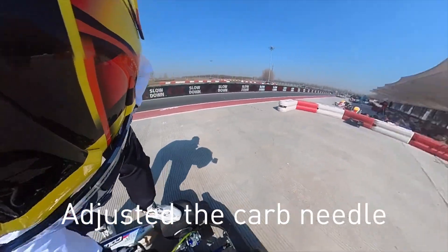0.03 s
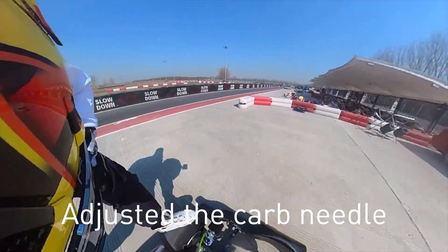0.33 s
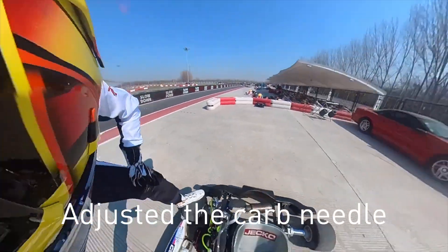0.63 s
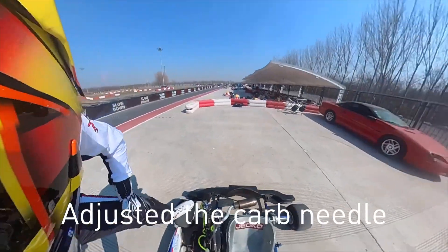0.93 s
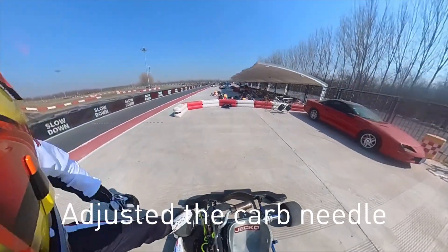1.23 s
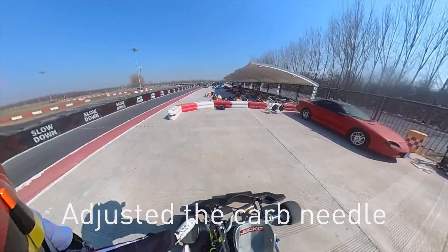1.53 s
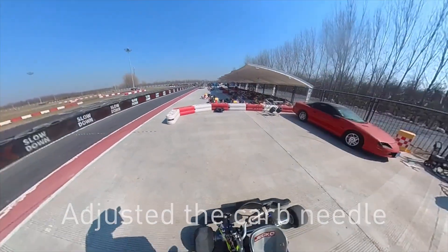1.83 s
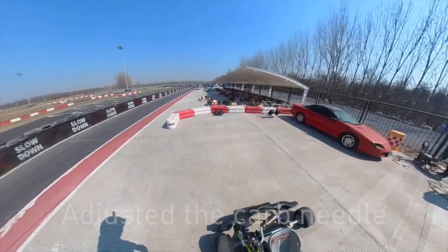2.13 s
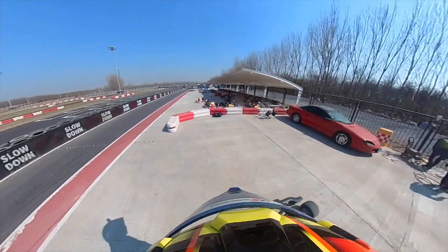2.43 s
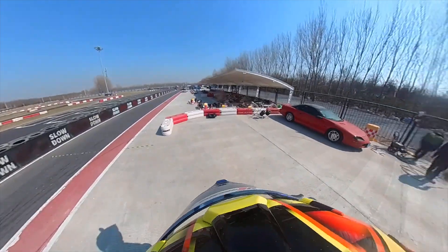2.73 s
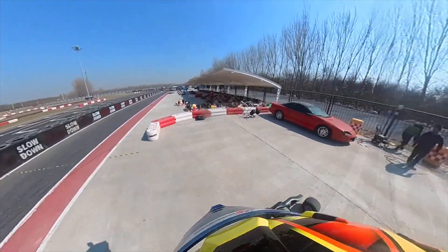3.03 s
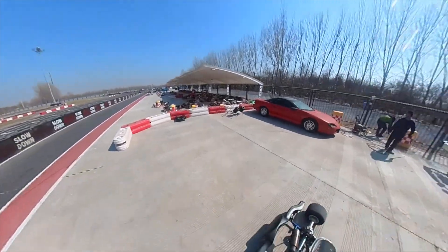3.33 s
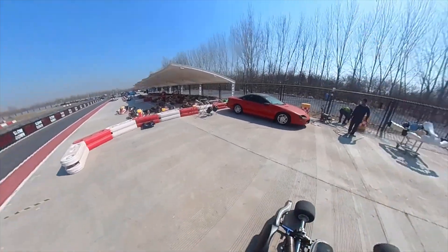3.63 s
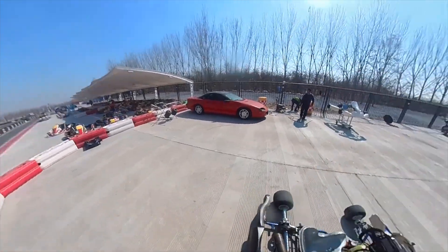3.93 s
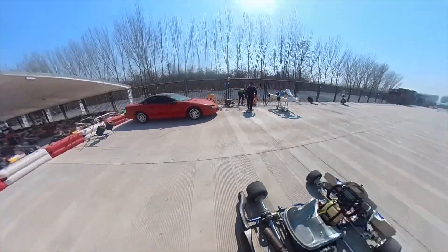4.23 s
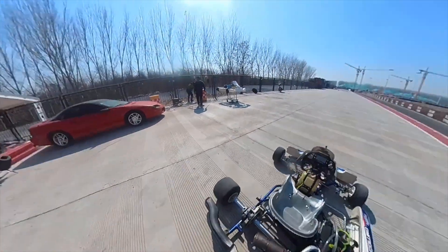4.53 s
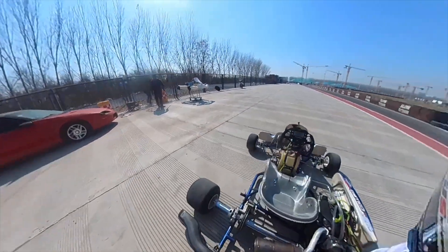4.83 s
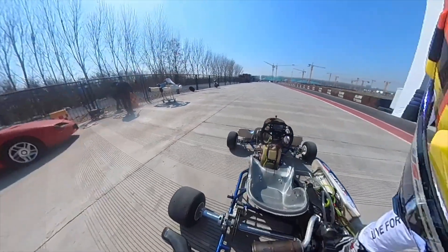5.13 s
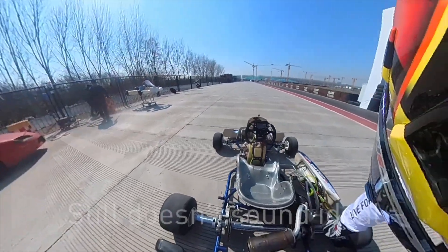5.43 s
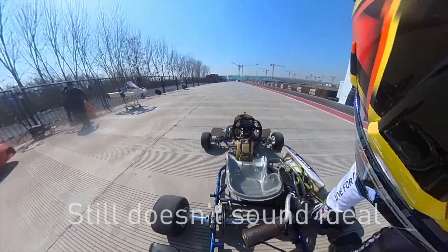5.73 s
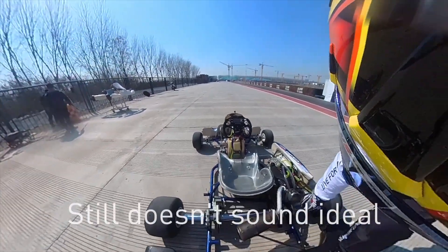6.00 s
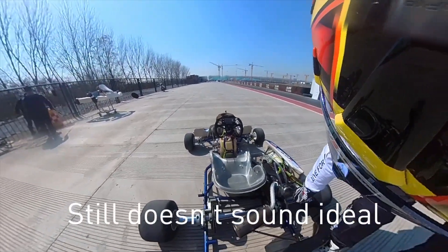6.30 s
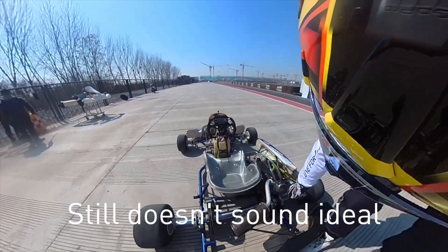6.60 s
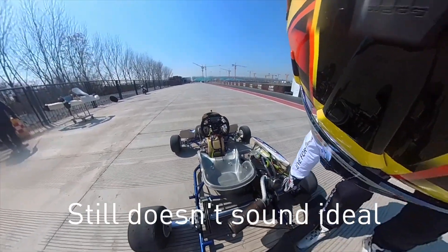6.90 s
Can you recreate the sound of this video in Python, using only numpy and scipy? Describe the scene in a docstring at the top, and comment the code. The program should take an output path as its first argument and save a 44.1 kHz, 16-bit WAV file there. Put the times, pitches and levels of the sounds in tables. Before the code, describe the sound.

On an open concrete paddock, a few soft knocks are followed by the clack and brief grind of a starter. A two-stroke kart engine catches and idles in rapid, uneven exhaust thumps, with metallic snaps, ticking gears and drive chatter. The microphone is close, with the kart slightly to the right. The clatter dulls for about a second, then brightens again. Another engine hums faintly in the distance.

```python
"""Two-stroke kart starting and idling

On an open concrete paddock, a few soft knocks; then the starter bites and grinds, and the engine catches,
firing every third turn of the crank. Each firing is a knock, a metallic snap and a swooping exhaust
thump. The gears tick on the two empty turns, and after a weak firing the slack drive chatters.
For a second the driver's helmet shields the treble. Another engine hums far off."""
import sys
import numpy as np
from scipy import signal
from scipy.fft import rfft, irfft
from scipy.io import wavfile
from scipy.ndimage import uniform_filter1d, minimum_filter1d, map_coordinates

SR = 44100
rng = np.random.default_rng(int(sys.argv[2]) if len(sys.argv) > 2 else 0)


def wav_out(sig):
    """Save sig, one row per channel (or a flat mono array), as 16-bit PCM at SR to the path in sys.argv[1]."""
    wavfile.write(sys.argv[1], SR, np.round(np.clip(np.atleast_2d(sig).T, -1, 1) * 32767).astype(np.int16))


N = 315756
TIME = np.arange(N) / SR

# the engine's firings, with relative levels: port_opens_s, thump_db, knock_db
FIRINGS = [(0.733, -13.5, -24), (0.801, -21.0, -22.5), (0.87, -23, -23), (0.951, -33, -30),
           (1.022, -19.5, -28.5), (1.104, -21.5, -25), (1.174, -10.5, -23.5), (1.264, -16.5, -29),
           (1.345, -8, -18), (1.437, -15, -28), (1.523, -8.5, -19.0), (1.618, -14.5, -28.5),
           (1.709, -7.5, -19), (1.801, -9.5, -23.5), (1.899, -7, -21.5), (2.004, -7.5, -21),
           (2.104, -7.5, -24.5), (2.207, -7.5, -18.5), (2.306, -20, -32), (2.404, -9.0, -21.0),
           (2.509, -20.5, -34), (2.613, -6, -21), (2.721, -7.5, -22), (2.83, -9, -23.5), (2.939, -7, -22.5),
           (3.048, -9, -23), (3.148, -8.5, -24.5), (3.247, -10, -23.5), (3.342, -9.5, -22.5),
           (3.441, -16, -24.5), (3.542, -11, -16.5), (3.628, -15.5, -29), (3.715, -8, -18.5),
           (3.808, -10, -23.5), (3.904, -11.5, -23.5), (4.008, -7.5, -19.5), (4.106, -14, -30.0),
           (4.202, -9, -21), (4.293, -13.5, -32), (4.38, -8, -27), (4.473, -6.5, -25),
           (4.564, -10.5, -29.5), (4.66, -6, -20.5), (4.758, -12, -30.5), (4.854, -7, -21.5),
           (4.949, -8.5, -23.5), (5.046, -12.5, -29), (5.138, -8.5, -22.5), (5.231, -14.0, -30.5),
           (5.319, -5.5, -19.5), (5.414, -7.5, -25), (5.509, -12.5, -25.5), (5.599, -7.5, -22),
           (5.692, -12.0, -29), (5.781, -7.5, -22), (5.874, -12.5, -26.5), (5.965, -7.5, -19),
           (6.061, -11.5, -26), (6.149, -8, -21), (6.234, -14.0, -33.5), (6.318, -7, -21.5),
           (6.409, -6.5, -23.5), (6.499, -7, -23), (6.588, -8, -11), (6.691, -7.0, -20.5),
           (6.792, -14, -21.5), (6.888, -8, -19.5), (6.984, -14, -25.5), (7.073, -7, -21.0)]
# broad tone of the engine block and pipe: freq_hz, gain_db
BLOCK_TONE = [(60, -12.5), (150, -3), (280, 0), (450, 2), (700, 1), (1100, -1.5), (1450, -0.5), (2000, -8),
              (2700, -8.5), (4500, -19), (6500, -36.5), (16000, -21)]
# the silencer's hollow tone: freq_hz, gain_db
SILENCER_TONE = [(50, -41), (120, -18), (215, 3.5), (290, -3), (385, -3), (450, -16), (600, -29.5),
                 (2000, -63)]
# ring of the starter's gear wheel: pitch_hz, width_hz, gain_db
GEAR_MODES = [(597, 92, 5), (1064, 51, 8), (1266, 19, 9.5), (1380, 38, 5), (3100, 83, -11), (4840, 66, 9)]
# the driver comes between engine and listener: time_s, upper_clatter_db, steel_parts_db
DRIVER_SHADOW = [(1.5, 0, -1), (2.2, 0.5, -2), (2.55, -10.5, -9), (3.15, -7, -7), (3.55, -2.5, -2),
                 (4.3, 1.5, 0), (7.1, 1, 0.5)]

CRANK_S = 0.62  # the crank starts to move
WEAK_DB = -11.5  # a thump under this leaves the drive slack; every dB above takes up some slack
HOLD_S = 0.023  # nominal time from the port opening to the thump's release


def undb(db):
    """Decibels to gain."""
    return 10 ** (np.asarray(db) / 20)


def response(tone, hz):
    """Gain of a (freq_hz, gain_db) tone curve at the given frequencies."""
    freq_hz, gain_db = np.transpose(tone)
    return undb(np.interp(np.log(hz + 1), np.log(freq_hz), gain_db))


def follow(rows, column=1):
    """One column of a control curve at every sample."""
    rows = np.array(rows)
    return np.interp(TIME, rows[:, 0], rows[:, column])


def colour(x, tone, modes=(), size=8192):
    """Ring x through a body with this tone and these modes; white noise keeps its power."""
    hz = np.fft.rfftfreq(size, 1 / SR)
    peaks = sum(undb(db) ** 2 / (1 + (2 * (hz - pitch) / width) ** 2) for pitch, width, db in modes)
    gain = response(tone, hz) * np.sqrt(1 + peaks)
    cepstrum = irfft(np.log(gain / np.sqrt(np.mean(gain ** 2))))
    # minimum phase: the ring follows the blow
    cepstrum[1:size // 2] *= 2
    cepstrum[size // 2 + 1:] = 0
    return signal.fftconvolve(x, irfft(np.exp(rfft(cepstrum))))[:N]


def stereo(mid, side):
    """Left and right: alike in the bass, unrelated in the treble."""
    # stereo width: freq_hz, side_minus_mid_db
    width = [(30, -5), (70, -12), (140, -14), (350, -16), (700, -19), (1300, -18), (2800, -6), (5500, -1.5),
             (16000, 0)]
    side = irfft(rfft(side) * response(width, np.fft.rfftfreq(N, 1 / SR)), N)
    return np.array([mid + side, mid - side])


def flicker(rate_hz, depth_db):
    """A gain of mean power 1 that wanders at random."""
    knots = rng.standard_normal(N // 8)
    gain = undb(depth_db * np.interp(TIME * rate_hz, np.arange(len(knots)), knots))
    return gain / np.sqrt(np.mean(gain ** 2))


def bursts(times, db, rise_s, fall_s):
    """Power envelope of blows that swell to a peak at the given times and die away."""
    power = np.zeros(N)
    for peak_s, gain in zip(times, undb(db)):
        near = slice(max(int((peak_s - 10 * rise_s) * SR), 0), int((peak_s + 10 * fall_s) * SR))
        t = TIME[near] - peak_s
        power[near] += (gain * np.exp(np.minimum(t / rise_s, -t / fall_s))) ** 2
    return power


def rush(force, tone):
    """Turbulent air, as strong as force."""
    return stereo(*(colour(force * rng.standard_normal(N), tone) for _ in range(2)))


def rattle(force, tone, modes, rate_hz, spread_db, scatter_s):
    """Random metal contacts, as strong as force, ring one body; the frame scatters each one."""
    contacts = (rng.random(N) < rate_hz / SR) * rng.choice([-1, 1], N)
    contacts = contacts * undb(spread_db * rng.standard_normal(N))
    contacts *= force / np.sqrt(np.mean(contacts ** 2))
    pole = np.exp(-2 / (scatter_s * SR))
    tails = np.sqrt(signal.lfilter([1 - pole], [1, -pole], contacts ** 2 + 1e-18))
    mid = (contacts + tails * rng.standard_normal(N)) / np.sqrt(2)
    side = tails * rng.standard_normal(N)
    return stereo(colour(mid, tone, modes), colour(side, tone, modes))


def running(fade_s=0.027):
    """Gain of the turning engine: it rises from silence as the crank starts to move."""
    return np.clip((TIME - CRANK_S) / fade_s + 1, 0, 1)


def strokes(turns_per_firing=3):
    """Per firing: the length of a crank turn (s), and how far the thump exceeds a weak one (dB)."""
    port_s, thump_db, _ = np.transpose(FIRINGS)
    gaps = np.diff(port_s)
    return np.append(gaps, np.median(gaps)) / turns_per_firing, np.maximum(thump_db - WEAK_DB, 0)


def paddock(air_db=-41, waver=0.00635):
    """Open-air rumble and another engine running steadily in the distance."""
    # tone of the open air: freq_hz, gain_db
    air_tone = [(18, -45), (30, -45), (75, -2), (303, -1.5), (600, -9), (666, -9), (2980, -31),
                (5900, -46.5), (16000, -44)]
    # partials of the distant engine: pitch_hz, level_db
    far_engine = [(205, -48), (297, -58), (398, -50), (500, -50.5), (598, -52), (834, -60.5)]
    speed = 1 + waver * (flicker(rate_hz=9, depth_db=6) - 1)
    clock = 2 * np.pi * np.cumsum(speed) / SR
    hum = sum(np.sqrt(2) * undb(db) * flicker(rate_hz=14, depth_db=-3.5) * np.sin(hz * clock)
              for hz, db in far_engine)
    return hum + rush(undb(air_db), air_tone)


def knocks(metal_gain_db=-6, boom_gain_db=-4):
    """Single blows that ring the metal and boom in the hollow parts."""
    # knocks on the frame, then the starter's clacks: start_s, metal_db, boom_db
    blows = [(0.033, -29, -31), (0.095, -38, -30), (0.168, -27.5, -41), (0.212, -34.5, -40),
             (0.236, -32, -21.5), (0.548, -33, -22), (0.574, -25.5, -34), (0.607, -6, -21.5),
             (0.686, -4.5, -40), (0.724, -12.5, -8.5), (0.796, -24, -27), (0.857, -14.5, -36), (1, -8, -30),
             (1.243, -10.5, -29)]
    start_s, metal_db, boom_db = np.transpose(blows)
    strike = bursts(start_s + 0.00081, metal_db + metal_gain_db, rise_s=0.0018, fall_s=0.015)
    boom = bursts(start_s + 0.0032, boom_db + boom_gain_db, rise_s=0.0025, fall_s=0.014)
    metal = rattle(np.sqrt(strike), BLOCK_TONE, GEAR_MODES, rate_hz=4000, spread_db=1.5, scatter_s=0.0022)
    return metal + rush(np.sqrt(boom), SILENCER_TONE)


def starter(gain_db=3, bite_s=0.0021, release_s=0.0097):
    """The pinion's teeth bite, scrape and slip on the ring gear."""
    # the pinion's scrapes: start_s, length_s, level_db
    scrapes = [(0.571, 0.0073, -35.5), (0.602, 0.011, -27.5), (0.686, 0.0054, -27), (0.73, 0.005, -28),
               (0.769, 0.095, -32), (0.863, 0.012, -26), (0.915, 0.11, -27)]
    # tone of the scraping teeth: freq_hz, gain_db
    teeth_tone = [(500, -30), (2000, 0), (4800, -6), (6400, -13.5), (8600, -1), (11500, 5), (16000, 2.5)]
    force = np.zeros(N)
    for start_s, length_s, level_db in scrapes:
        edges = np.minimum((TIME - start_s) / bite_s, (start_s + length_s - TIME) / release_s)
        force += undb(level_db + gain_db) * np.exp(np.minimum(edges, 0))
    return rattle(force, teeth_tone, GEAR_MODES, rate_hz=1600, spread_db=1, scatter_s=0.0026)


def piston_and_gears(snap_db=-24, hardness=1.37, taut_per_db=1.2, sizzle_db=-50, jitter_s=0.0022):
    """The piston slaps harder with a harder knock; clutch and gears tick on the two empty turns."""
    # tone of the small steel parts: freq_hz, gain_db
    steel_tone = [(1500, -26), (4000, 3), (5200, -1), (6800, -10), (8000, -5.5), (8900, 0), (9900, -5.5),
                  (11500, 6.5), (16000, 2)]
    # their ring: pitch_hz, width_hz, gain_db
    steel_modes = [(4230, 48, 5), (5370, 44, -2), (7030, 100, -0.5), (8750, 24, 6.5), (9250, 51, 2.9),
                   (10900, 72, 0), (13200, 79, 1), (15200, 120, 4)]
    port_s, _, knock_db = np.transpose(FIRINGS)
    turn_s, excess_db = strokes()
    loose_s = port_s + jitter_s * rng.standard_normal((len(port_s), 3)).T
    luck_db = rng.uniform(-5, 5, (len(port_s), 3)).T
    slap_db = snap_db + hardness * (knock_db - np.median(knock_db))
    tick_db = -34 - taut_per_db * excess_db
    power = bursts(port_s - 0.0069, slap_db, rise_s=0.0007, fall_s=0.006)
    # a softer snap just ahead of the slap, then one tick for each empty turn
    power += bursts(loose_s[0] - 0.015, slap_db - 7 + luck_db[0], rise_s=0.0018, fall_s=0.0051)
    power += bursts(loose_s[1] + turn_s, tick_db + luck_db[1], rise_s=0.001, fall_s=0.007)
    power += bursts(loose_s[2] + 2 * turn_s, -39 + luck_db[2], rise_s=0.001, fall_s=0.006)
    power += (undb(sizzle_db) * running()) ** 2
    force = np.sqrt(power) * undb(follow(DRIVER_SHADOW, 2))
    return rattle(force, steel_tone, steel_modes, rate_hz=2600, spread_db=2.5, scatter_s=0.0009)


def driver_shadow(sound, split_hz=1900, low_share=0.19, treble_db=1.5):
    """The driver shadows the upper clatter; most of the lower bends round."""
    low = signal.sosfiltfilt(signal.butter(2, split_hz, fs=SR, output="sos"), sound)
    shadow_db = follow(DRIVER_SHADOW, 1)
    return low * undb(low_share * shadow_db) + (sound - low) * undb(shadow_db + treble_db)


def block(knock_gain_db=4, chatter_db=-20.5, taut_per_db=4, clatter_db=-30.5, cranking_db=3):
    """Combustion knocks the block before the port opens; after a weak firing the slack drive chatters."""
    # ring of the block and pipe: pitch_hz, width_hz, gain_db
    block_modes = [(387.2, 12, 9), (521, 30, 3), (1200, 16, -14), (1546, 8.4, 4), (1854, 16, 6),
                   (2078, 25, 2.5), (2222, 20, 5.5), (2442, 40, 3), (2586, 28, 5), (3443, 61, 4),
                   (4340, 140, -17)]
    # the pipe shell's strongest ring, from beside the kart and from behind: pitch_hz, width_hz, gain_db
    ring_beside = [(739, 24.4, 6.1)]
    ring_behind = [(886, 31, 8.2)]
    port_s, _, knock_db = np.transpose(FIRINGS)
    turn_s, excess_db = strokes()
    speed = np.clip((TIME - CRANK_S) / 0.79, 0, 1)  # the drive spins up
    knock = bursts(port_s - 0.008, knock_db + knock_gain_db, rise_s=0.005, fall_s=0.013)
    chatter = bursts(port_s + 0.8 * turn_s, chatter_db - taut_per_db * excess_db,
                     rise_s=0.008, fall_s=0.034)
    clatter = (undb(clatter_db + cranking_db * (1 - speed)) * running()) ** 2
    power = knock + chatter * speed ** 2 + clatter
    behind = np.interp(TIME, [4.3, 4.8], [0, 1])  # the listener steps round to the tail
    return sum(rattle(np.sqrt(power * share), BLOCK_TONE, block_modes + ring,
                      rate_hz=1500, spread_db=3, scatter_s=0.0047)
               for share, ring in [(1 - behind, ring_beside), (behind, ring_behind)])


def pipe_ring(t, settled, swell_s=0.0068, decay_s=0.038, spread_db=2.5, detune=0.025):
    """The pipe rings on after the port shuts, struck a little differently by every firing."""
    # the pipe's modes, relative to the thump: pitch_hz, cold_db, settled_db
    pipe_modes = [(283.2, -16.5, -32), (387.5, -24.5, -16)]
    after = np.maximum(t - HOLD_S, 0)
    ring = np.zeros(len(t))
    for hz, cold_db, settled_db in pipe_modes:
        force, heat = rng.standard_normal(2)
        gain = undb(cold_db + settled * (settled_db - cold_db) + spread_db * force)
        ring += gain * np.sin(2 * np.pi * hz * (1 + detune * heat) * after)
    return ring * (1 - np.exp(-after / swell_s)) * np.exp(-after / decay_s)


def gas_swoop(t, settled, vigour, open_hz=415, bottom_s=0.01152, sink_s=0.01547, rise_s=0.01208):
    """Base pitch and envelope of the gas: it sinks as the piston opens the port, rises as it closes."""
    # as the idle settles, the swing gets shorter and lower
    age = t / np.interp(settled, [0, 1], [1.099, 0.9])
    bottom_hz = np.interp(settled, [0, 1], [126.9, 113.5])
    closed_hz = np.interp(settled, [0, 1], [276, 251.3])
    # a weak firing starts from a lower note
    sink = (0.4 + 0.6 * vigour) * np.clip((bottom_s - age) / sink_s, 0, 1) ** 2.65
    rise = 1 - np.exp(-(np.maximum(age - bottom_s, 0) / rise_s) ** 1.5)
    hz = bottom_hz + (open_hz - bottom_hz) * sink + (closed_hz - bottom_hz) * rise
    attack = np.exp(np.minimum(age - 0.0049, 0) / 0.0054)
    release = np.exp(-np.maximum(age - HOLD_S, 0) / 0.0072)
    return hz, attack * release


def exhaust(gain_db=1, settling_s=(2.91, 4.9), detune=0.05, pitch_per_db=0.0364, muffle_hz=470):
    """Each firing sets the gas in the cylinder and pipe swinging: a swooping thump."""
    port_s, thump_db, _ = np.transpose(FIRINGS)
    t = np.arange(int(-0.016 * SR), int(0.08 * SR)) / SR  # zero as the port opens
    fades = signal.windows.tukey(len(t), 0.1)
    thumps = np.zeros(N + len(t))
    for start_s, db, (heat, skew, edge) in zip(port_s, thump_db, rng.standard_normal((len(port_s), 3))):
        settled = np.interp(start_s, settling_s, [0, 1])
        vigour = np.interp(db, [WEAK_DB, thump_db.max()], [0, 1])
        hz, envelope = gas_swoop(t, settled, vigour)
        # a stronger firing leaves hotter gas, which rings higher
        hz *= 1 + detune * heat + pitch_per_db * max(db - WEAK_DB, 0)
        phase = 2 * np.pi * np.cumsum(hz) / SR
        phase -= np.interp(0, t, phase)
        # the silencer muffles the overtone as the pitch climbs
        overtone = undb(-9 + 3 * edge) / (1 + (2 * hz / muffle_hz) ** 4)
        swing = np.sin(phase) + overtone * np.sin(2 * phase + skew)
        i = int((start_s + t[0]) * SR)
        thumps[i:i + len(t)] -= undb(db + gain_db) * fades * (envelope * swing + pipe_ring(t, settled))
    return thumps[:N]


def silencer(puff_db=-16, ring_db=-22, drone_db=-39):
    """Gas puffs out with each thump, and the silencer rings on over a low drone."""
    # rumble of escaping gas: freq_hz, gain_db
    puff_tone = [(15, -3), (35, -32), (70, 9), (150, 20), (500, -57), (2000, -79)]
    port_s, thump_db, _ = np.transpose(FIRINGS)
    puff = bursts(port_s + 0.0029, thump_db + puff_db, rise_s=0.0054, fall_s=0.017)
    ring = bursts(port_s + 0.036, thump_db + ring_db, rise_s=0.03, fall_s=0.083)
    drone = (undb(drone_db) * running()) ** 2
    return rush(np.sqrt(puff), puff_tone) + rush(np.sqrt(ring + drone), SILENCER_TONE)


def scene(metal_pan_db=-1.5, paddock_pan_db=-6):
    """The kart close by, a little to the right, over the paddock's distant hum."""
    # the engine as the listener's head turns: time_s, left_minus_right_db, right_delay_s
    head_turn = [(1.4, -.6, .00001), (2.2, -1, .00007), (2.8, -2.9, .00016), (3.8, -1.9, .00009),
                 (4.8, -.6, .00003), (7.1, -.2, .00005)]
    sides = np.array([[0.5], [-0.5]])
    engine = driver_shadow(block()) + exhaust() + silencer()
    left, right = engine * undb(sides * follow(head_turn, 1))
    right = map_coordinates(right, [(TIME - follow(head_turn, 2)) * SR], mode="nearest")
    metal = (piston_and_gears() + starter() + knocks()) * undb(sides * metal_pan_db)
    return np.array([left, right]) + metal + paddock() * undb(sides * paddock_pan_db)


def record(dry, ceiling=0.44, hold_s=0.0033, top_hz=16000):
    """A limiter ducks the loudest swings, and the top is cut."""
    span = int(hold_s * SR)
    gain = np.minimum(1, ceiling / (np.abs(dry).max(axis=0) + 1e-9))
    limited = dry * uniform_filter1d(minimum_filter1d(gain, span), span)
    return signal.sosfilt(signal.ellip(10, 0.2, 80, top_hz, fs=SR, output="sos"), limited)


dry = scene()
out = record(dry)
wav_out(out)
```